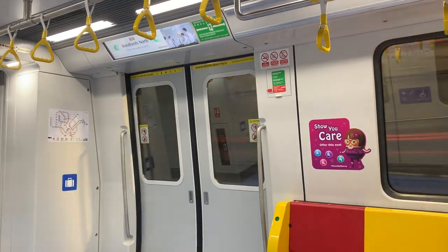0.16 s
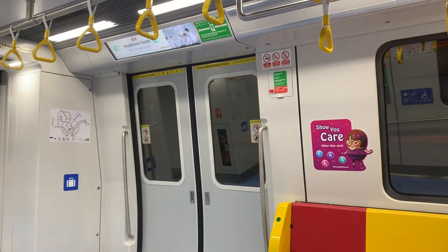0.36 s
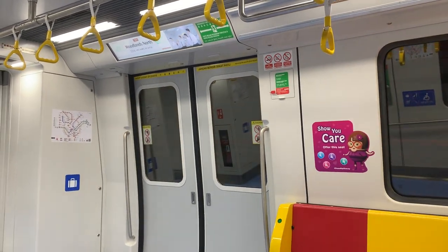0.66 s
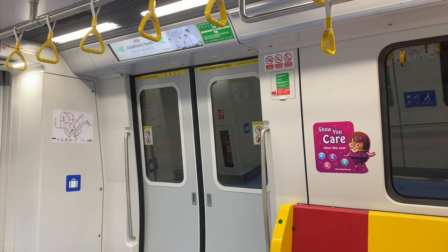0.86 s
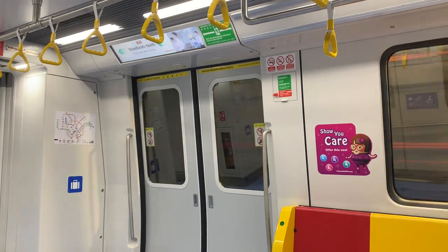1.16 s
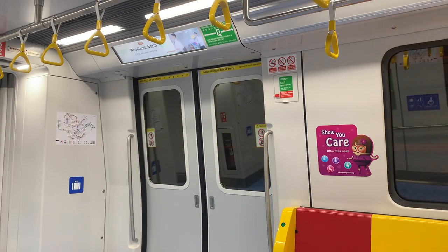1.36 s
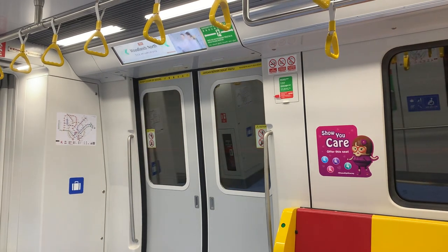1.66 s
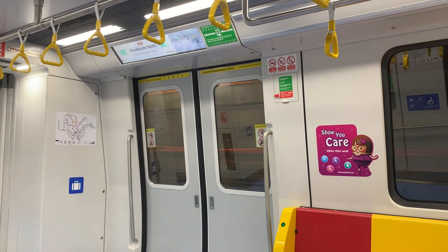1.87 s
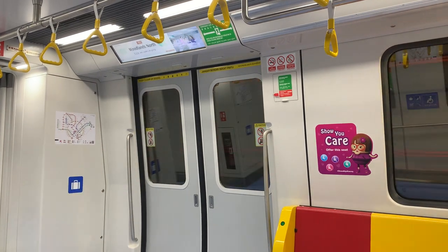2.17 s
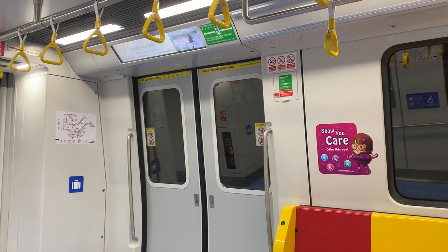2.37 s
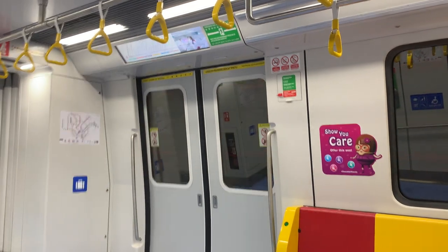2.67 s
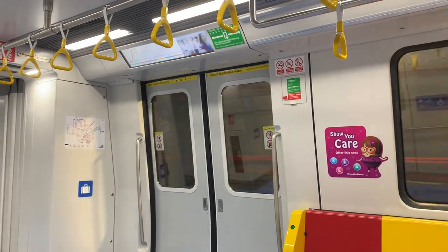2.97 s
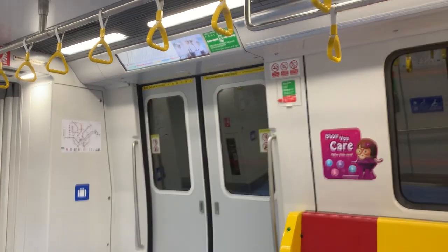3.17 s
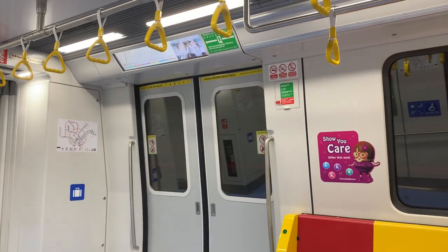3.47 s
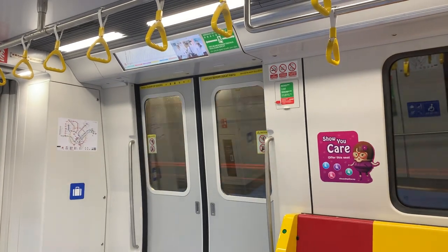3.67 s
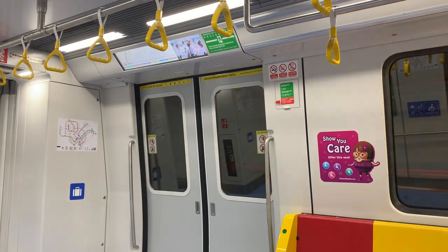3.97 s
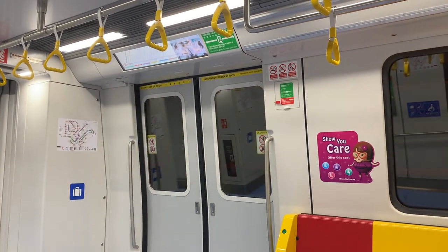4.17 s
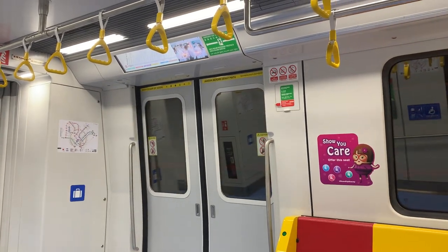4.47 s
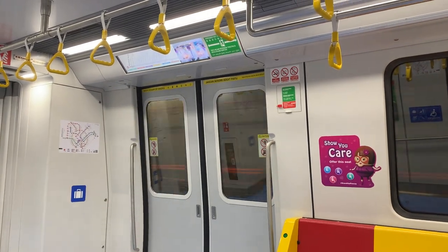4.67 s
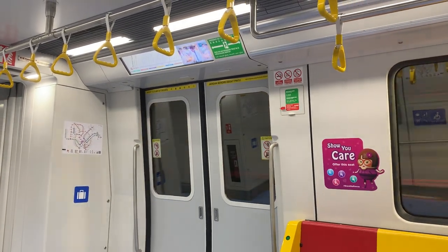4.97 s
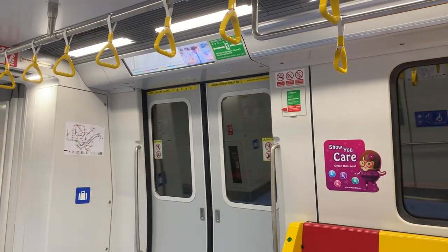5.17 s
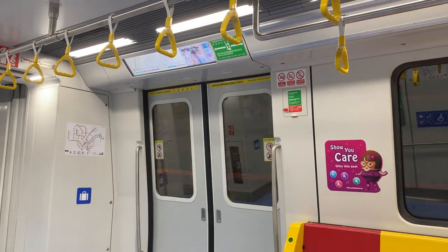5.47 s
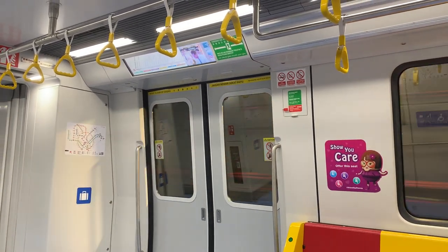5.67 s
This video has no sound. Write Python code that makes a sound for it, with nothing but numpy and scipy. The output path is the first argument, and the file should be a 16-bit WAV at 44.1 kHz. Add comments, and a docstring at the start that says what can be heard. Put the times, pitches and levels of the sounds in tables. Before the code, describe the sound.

Heard inside a metro car decelerating through a tunnel, with no stops or door movements, for nearly six seconds. A dominant, slightly nasal hum near 300 Hz wavers throughout, broken into short random throbs, strongest from about 0.5 to 2.2 s. Around it is a grainy rail roar at 500 to 900 Hz, with a thinner ring above 1 kHz, weak wheel whine near 2 kHz, and modest low rumble and drone. Air hisses softly at the door seals, brightest in the first second, with barely audible high rustles at 0.6 and 0.9 s, then fades steadily. After 3 s a narrow rail note near 720 Hz emerges, swelling around 3.5, 4.4 and 4.9 s. From 4.2 s the hum drifts up towards 335 Hz and weakens, leaving roar more exposed until the end. Two closely spaced microphone ports give compact stereo, with nearly centred bass and slightly spread hiss.

```python
"""Wheels humming on their track springs, heard inside a metro car slowing down in a tunnel.
Rough rails shake wheels, track and floor: noise through the resonances of each, with short sine throbs on top.
Behind them lie a rail note and roar, wheel whine, body drone and rumble, and air hissing past the door seals.
Two microphone ports a few centimetres apart hear the bass nearly alike and the high hiss with a short lag."""
import sys
import numpy as np
from scipy import signal
from scipy.fft import rfft, irfft, next_fast_len
from scipy.io import wavfile
from scipy.ndimage import uniform_filter1d, map_coordinates

SR = 44100
rng = np.random.default_rng(int(sys.argv[2]) if len(sys.argv) > 2 else 0)


def transcribe(u):
    """Save the signal u as a 16-bit wav file named by the first command-line argument.

    u: samples, shape (n,) or (channels, n), limited to [-1, 1]; the rate is SR.
    q: integer samples, one column per channel.
    """
    v = np.clip(np.atleast_2d(u).T, -1, 1)
    q = np.round(v * 32767).astype(np.int16)
    wavfile.write(sys.argv[1], SR, q)


N = 256662  # samples, 5.82 s

# All levels are before the microphone; those of modes and spectra are relative within their table.

# Hum of the wheels on the track springs: t/s, lower hum f/Hz, lower hum level/dB, upper hum level/dB
HUM_TRACK = [(0, 301.8, -21, -21.5), (.5, 299.5, -21.5, -19.5), (1.05, 302.2, -19.5, -25.5),
             (1.2, 317.4, -17, -20.5), (1.6, 318.1, -20, -18.5), (1.8, 297.9, -21.5, -18.5),
             (2.2, 297.4, -16.5, -23), (2.6, 303.2, -22.5, -22), (3, 297.2, -22.5, -18.5),
             (3.35, 291.3, -22.5, -20), (3.8, 303, -24, -24), (4.25, 318.1, -20.5, -25.5),
             (4.7, 337, -25, -25.5), (5, 339.2, -30.5, -25), (5.35, 322.3, -25.5, -27),
             (5.82, 336.4, -30, -29.5)]
# Upper hum resonances: f/Hz, width/Hz, level/dB
UPPER_HUM_MODES = [(347.8, 35, 1.5), (317, 36, -2.5)]
# Floor resonances: f/Hz, width/Hz, level/dB
FLOOR_MODES = [(231.4, 15, -0.36), (221, 11, -1.4), (269, 40, -0.25)]
# Floor level around its turning point: t/s, level/dB, slope before/(dB/s), fall after/(dB/s)
FLOOR_CREST = (1.5, -29, 1, 2)


def hum():
    """Wheelsets bounce on the track springs; the lower resonance wanders in pitch and fades as the car slows."""
    pitch_hz, low_db, high_db = curves(HUM_TRACK)
    skirt = amp(-3.5) * gliding(pitch_hz, width_hz=26.5)
    core = amp(-3.0) * gliding(pitch_hz, width_hz=6.2)
    lower = amp(low_db) * (skirt + core)
    upper = amp(high_db) * singing(UPPER_HUM_MODES, steep=3.0)
    floor = crest(*FLOOR_CREST) * singing(FLOOR_MODES, steep=2.6)
    return lower + upper + floor


# Strongest throbs of hum and roar: t/s, f/Hz, peak level/dB, length between the -4.8 dB points/s
THROB_EVENTS = [(0.146, 309, -12, 0.057), (0.283, 300, -12, 0.029), (0.512, 302, -10, 0.029),
                (0.571, 309, -15.5, 0.044), (0.622, 305, -7.5, 0.017), (0.687, 305.5, -9.5, 0.039),
                (0.827, 298, -6, 0.051), (0.933, 305, -10, 0.056), (1.014, 305, -5.5, 0.022),
                (1.468, 314, -12, 0.034), (1.561, 325, -12, 0.031), (1.791, 306, -8, 0.028),
                (1.838, 298, -7, 0.021), (1.951, 296, -9, 0.1), (2.055, 305, -6.5, 0.025),
                (2.188, 291, -12, 0.031), (2.278, 351, -16.5, 0.11), (2.432, 310, -11, 0.028),
                (2.51, 307, -11, 0.068), (3.036, 314, -10, 0.024), (3.247, 349, -13.5, 0.069),
                (3.382, 299, -11, 0.029), (3.647, 348, -6, 0.0092), (3.778, 302, -11, 0.024),
                (2.561, 601, -20.5, 0.048), (2.614, 322, -11, 0.052), (2.72, 654, -19, 0.059),
                (3.4, 665, -17.5, 0.04), (2.749, 299, -16.5, 0.05), (3.867, 352, -13, 0.011),
                (4.122, 314, -14.5, 0.03), (4.196, 316, -15.5, 0.026), (4.668, 332.5, -16.5, 0.052),
                (4.758, 329, -12.5, 0.017), (4.846, 355, -18, 0.011), (5.047, 339, -16, 0.039),
                (5.534, 357, -17, 0.034)]


def throbs():
    """Short sine swells, as narrow noise makes by chance; level and phase differ randomly at each port."""
    half = SR // 2
    t = np.arange(-half, half) / SR
    out = np.zeros((2, N + SR))  # half a second spare at both ends
    sides = np.array([[1], [-1]])  # left, right
    chances = rng.standard_normal((len(THROB_EVENTS), 3))
    for (s, hz, db, length), (start, shift, pan) in zip(THROB_EVENTS, chances):
        swell = amp(db - 4.8 * (2 * t / length) ** 2 + 1.2 * pan * sides)
        phase = 2 * np.pi * hz * t + 2 * np.pi * start + 0.3 * shift * sides
        at = round(s * SR)
        out[:, at:at + len(t)] += swell * np.sin(phase)
    return out[:, half:half + N]


# Passing resonances of rails and floor, one per level row below: f/Hz, width/Hz, level/dB
PASSING_RESONANCES = [(384.6, 27.5, 0), (1203, 57, 0), (1454, 110, 0), (110, 8.2, 0)]
# Their levels: t/s of the crest, level/dB, rise before/(dB/s), fall after/(dB/s)
PASSING_CRESTS = [(0.37, -26, 2, 2.13), (0.56, -35, 3, 14), (3.76, -35, 3.5, 2.6), (2.1, -42, 2.5, 5.5)]


def passing():
    """Passing resonances of rails and floor; each swells to its crest time and fades."""
    pairs = zip(PASSING_CRESTS, PASSING_RESONANCES)
    return sum(crest(*level) * singing([mode], steep=2.7) for level, mode in pairs)


# Narrow rail note inside the roar: t/s, f/Hz, level/dB
RAIL_NOTE_TRACK = [(0, 745, -31.5), (.4, 735, -23), (.8, 715, -34.5), (2.6, 715, -32.5), (3.1, 705, -29),
                   (3.5, 722, -22), (3.95, 725, -29.5), (4.35, 724, -21.5), (4.7, 724, -27),
                   (4.9, 722, -18.5), (5.15, 722, -32), (5.42, 716, -23.5), (5.82, 720, -32.5)]


def rail_note():
    """A narrow rail resonance that drifts in pitch."""
    hz, db = curves(RAIL_NOTE_TRACK)
    return amp(db) * gliding(hz, width_hz=14)


# Level of the rail roar: t/s, lower roar level/dB, upper roar level/dB, ring level/dB
ROAR_LEVELS = [(0, -21, -25, -32.5), (.8, -23, -32, -33.5), (1.5, -22, -25.5, -33.5),
               (2.3, -21.5, -24, -31), (2.8, -20.5, -23, -28.5), (3.5, -21.5, -20.5, -30),
               (3.9, -24, -24.5, -29), (4.4, -21, -22.5, -25.5), (5, -24, -24.5, -28),
               (5.82, -23, -29.5, -29)]
# Resonances of lower roar, upper roar, ring and shoulder: f/Hz, width/Hz, level/dB
LOW_ROAR_MODES = [(557, 45, -5), (624.3, 125, 1), (474, 100, -12.5)]
HIGH_ROAR_MODES = [(902, 160, -9), (730, 89, 1.5), (777, 52, -3)]
RING_MODES = [(1135, 200, 1.5), (1385, 450, -7)]
SHOULDER_MODES = [(873, 130, 1.9), (962, 33, -0.9)]
# Shoulder level around its turning point: t/s, level/dB, slope before/(dB/s), fall after/(dB/s)
SHOULDER_CREST = (0.27, -29, -0.5, 3)


def roar():
    """The rails bend between their supports and radiate into the tunnel."""
    low_db, high_db, ring_db = curves(ROAR_LEVELS)
    low = amp(low_db) * patchy(singing(LOW_ROAR_MODES, steep=3.36), depth_db=1.2)
    high = amp(high_db) * patchy(singing(HIGH_ROAR_MODES, steep=3.6), depth_db=1.16)
    shoulder = crest(*SHOULDER_CREST) * patchy(singing(SHOULDER_MODES, steep=4.0), depth_db=1.5)
    ring = amp(ring_db) * patchy(singing(RING_MODES, steep=3.65), depth_db=2.0)
    return low + high + shoulder + ring


# Sounds of the car body: t/s, rumble level/dB, wheel whine level/dB
BODY_LEVELS = [(0, -31.5, -32.5), (.4, -33.5, -31.5), (1.9, -36.5, -32), (2.3, -34, -33.5),
               (3.1, -34, -32.5), (3.8, -36.5, -34), (4.6, -39.5, -31.5), (5.1, -38.5, -34.5),
               (5.82, -35.5, -34)]
# Resonances of wheel whine and floor rumble: f/Hz, width/Hz, level/dB
WHINE_MODES = [(2080, 390, -0.57), (2360, 390, -0.43)]
RUMBLE_MODES = [(51.3, 14, -6), (86, 16, -4), (111.7, 14, 0), (140.6, 18, -2), (170, 23, -1.5)]


def whine_and_rumble():
    """Roughness heard through the wheels' high resonances and the floor's low ones."""
    rumble_db, whine_db = curves(BODY_LEVELS)
    whine = amp(whine_db) * patchy(singing(WHINE_MODES, steep=2.84), depth_db=2.5)
    return whine + amp(rumble_db) * singing(RUMBLE_MODES, steep=3.05)


# Lowest drone of the car body: t/s, f/Hz, level/dB
DRONE_TRACK = [(0, 72.05, -35.5), (.35, 72.07, -31.5), (1, 67, -37.5), (2, 65, -38), (3, 62, -40.5),
               (3.8, 63.9, -47), (4.4, 71.1, -41), (5.3, 73.7, -41), (5.82, 71.8, -39)]


def drone():
    """A narrow low resonance of the car body that drifts in pitch."""
    hz, db = curves(DRONE_TRACK)
    return amp(db) * gliding(hz, width_hz=13)


# Air at the door seals, dying as the car slows: t/s, door hiss level/dB, highest hiss relative to it/dB
AIR_LEVELS = [(0, -36.5, -18), (.42, -35, -15.5), (1.26, -37.5, -16), (1.6, -36.5, -16.5), (2.1, -38, -16),
              (2.55, -40.5, -13.5), (3.1, -41, -18), (3.78, -44, -16.5), (4.28, -43, -19.5),
              (5.33, -45.5, -18), (5.82, -45.5, -18)]
# Spectra of door hiss and highest hiss: f/Hz, level per Hz/dB
HISS_SPECTRUM = [(1500, -23), (2800, 1.5), (4000, 0), (5200, -2.5), (7000, -12), (8000, -31), (9000, -61.5)]
TOP_HISS_SPECTRUM = [(6000, -30), (7300, 0), (8600, -1), (9200, -3), (9700, 0), (10700, -9), (11700, -14),
                     (12300, -20), (13000, -30), (15200, -30)]


def door_hiss():
    """Air rushing past the door seals makes broad noise; its highest part wanders a little more."""
    hiss_db, top_db = curves(AIR_LEVELS)
    hiss = patchy(field(lambda hz: amp(along(HISS_SPECTRUM, hz))), depth_db=1.85)
    top = patchy(field(lambda hz: amp(along(TOP_HISS_SPECTRUM, hz))), depth_db=2.0)
    top_level_db = hiss_db + top_db + 0.63 * wobble(5.6)
    return amp(hiss_db) * hiss + amp(top_level_db) * top


# Faint high rustles: t/s, level/dB before the onset softens it, time to fall 60 dB/s
RUSTLE_EVENTS = [(.625, -52, .4), (.93, -57, .3)]


def rustles():
    """Short swells of noise around 10.5 kHz, each with a quick start and an exponential fall."""
    t = np.arange(N) / SR
    size = np.zeros(N)
    for s, db, t60 in RUSTLE_EVENTS:
        onset = 1 - np.exp(-np.maximum(t - s, 0) / .004)  # silent before s
        size += onset * amp(db - 60 * np.abs(t - s) / t60)
    return size * field(lambda hz: (hz / 10500) ** 6 / (1 + (hz / 10500) ** 12))


def amp(db):
    """Gain of a level in dB."""
    return 10 ** (np.asarray(db) / 20)


def unit(x):
    """Scaled to rms 1."""
    return x / np.sqrt(np.mean(x ** 2) + 1e-20)


def along(points, hz):
    """Value at hz between (Hz, value) points on a log axis."""
    f, v = np.transpose(points)
    return np.interp(np.log(hz + 1), np.log(f + 1), v)


def curves(rows):
    """One value per sample for each column after the time."""
    s, *cols = np.transpose(rows)
    return [np.interp(np.arange(N) / SR, s, c) for c in cols]


def wobble(rate):
    """A smooth random curve, rate knots a second."""
    knots = rng.standard_normal(int(N * rate / SR) + 4)
    return map_coordinates(knots, [np.arange(N) * rate / SR])


DRIFT_DB, DRIFT_RATE = 1, 2.17  # chance wander: depth in dB, knots a second


def crest(s, db, rise, fall):
    """Gain in dB with one slope up to s and another after it, wandering a little by chance."""
    t = np.arange(N) / SR - s
    slope_db = np.where(t < 0, rise * t, -fall * t)
    return amp(db + slope_db + DRIFT_DB * wobble(DRIFT_RATE))


def filtered(x, response):
    """x shaped by a real or complex response of frequency."""
    m = next_fast_len(N + 8192)
    return irfft(rfft(x, m) * response(np.fft.rfftfreq(m, 1 / SR)), m)[..., :N]


# How alike the two ports hear the noise: f/Hz, likeness/0-1
LIKENESS = [(30, 0.93), (130, 0.97), (250, 0.78), (420, 0.3), (560, 0.52), (1000, 0.11), (3000, 0.04),
            (5800, 0.28), (7000, 1), (8500, 1), (15000, 1)]


def field(gain):
    """Noise of rms 1 at both ports, partly shared between them, coloured by gain(Hz)."""
    def split(hz):
        turn = np.arccos(np.clip(along(LIKENESS, hz), 0, 1)) / 2
        return gain(hz) * [np.cos(turn), np.sin(turn)]

    both, apart = filtered(rng.standard_normal((2, N)), split)
    return unit(np.array([both + apart, both - apart]))


def singing(modes, steep):
    """Rail roughness heard through resonances whose skirts fall off with the power steep."""
    def gain(f):
        power = sum(amp(db) ** 2 / (1 + np.abs(2 * (f - hz) / w) ** steep) for hz, w, db in modes)
        return np.sqrt(power)

    return field(gain)


def gliding(pitch_hz, width_hz):
    """A narrow band of noise carried along a moving pitch."""
    start = pitch_hz[0]
    band = signal.hilbert(singing([(start, width_hz, 0)], steep=3.25))
    glide = 2 * np.pi * np.cumsum(pitch_hz - start) / SR
    return (band * np.exp(1j * glide)).real


def patchy(x, depth_db):
    """Random swells, each under two hundred Hz wide and about 25 ms long."""
    z = signal.stft(x, nperseg=512)[2]
    spots = rng.standard_normal(z.shape[1:])
    spots = uniform_filter1d(spots, size=2, axis=0)  # across frequency
    spots = uniform_filter1d(spots, size=4, axis=1)  # across time
    return signal.istft(z * amp(depth_db * unit(spots)), nperseg=512)[1][:, :N]


def scene():
    """Everything heard in the car."""
    near = hum() + throbs() + passing() + rail_note() + roar()
    return near + whine_and_rumble() + drone() + door_hiss() + rustles()


# Phase between the ports: f/Hz, left lead/rad
PORT_LEAD = [(30, 0.5), (300, -0.58), (1000, 1.35), (1900, -0.84), (2800, 3), (4000, -0.04), (5200, 3.5)]
# Level between the ports: f/Hz, left minus right level/dB
PORT_TILT = [(60, -2.7), (190, -1.5), (350, -.6), (700, 1), (1120, 1), (2500, -.5), (5200, -4), (7000, 0)]
HISS_LAG, IN_STEP_HZ = .000213, 6300  # s the left port lags in the high hiss; Hz where the ports agree


def ports(hz):
    """Phase and level of each microphone port: half the difference on each side."""
    lead = along(PORT_LEAD + [(IN_STEP_HZ, 2 * np.pi)], hz)  # a whole turn is in step
    lead = lead - 2 * np.pi * HISS_LAG * np.maximum(hz - IN_STEP_HZ, 0)
    left = amp(along(PORT_TILT, hz) / 2) * np.exp(.5j * lead)
    return np.array([left, 1 / left])


CEILING, KNEE = .95, 6  # soft top of the input stage: full-scale fraction, sharpness
TOP_HZ = 15250  # band limit


def record(dry):
    """The two ports, a soft top on the highest peaks, then the band limit."""
    heard = filtered(dry, ports)
    rounded = heard / (1 + np.abs(heard / CEILING) ** KNEE) ** (1 / KNEE)
    return filtered(rounded, lambda hz: hz < TOP_HZ)


dry = scene()
out = record(dry)
transcribe(out)
```